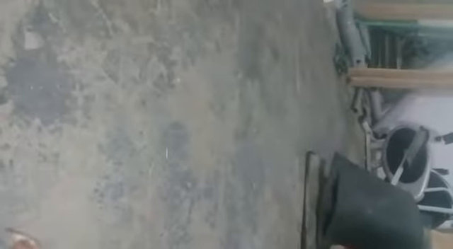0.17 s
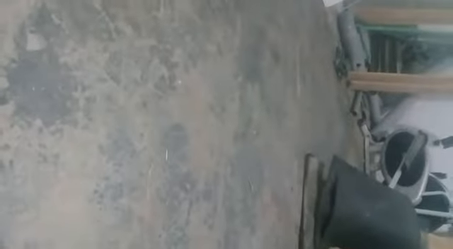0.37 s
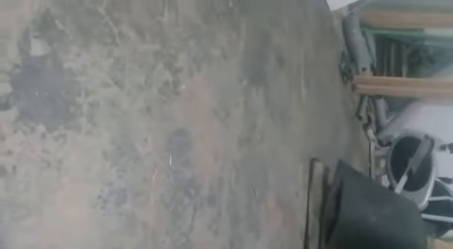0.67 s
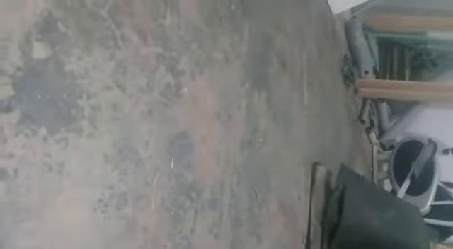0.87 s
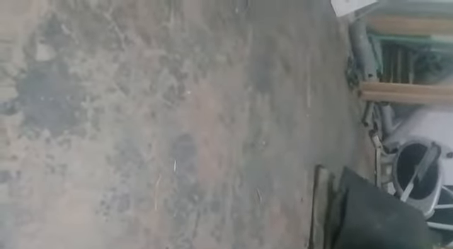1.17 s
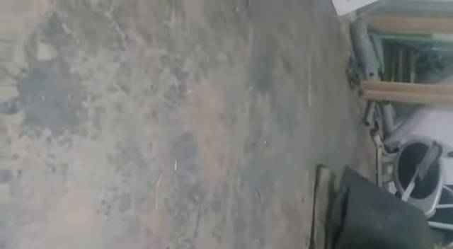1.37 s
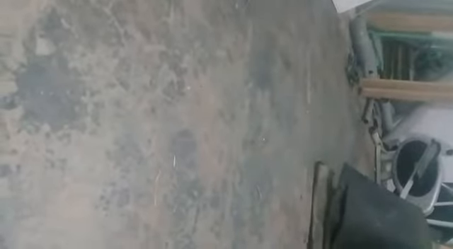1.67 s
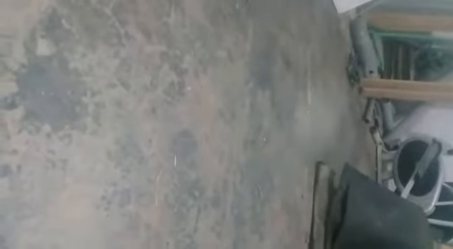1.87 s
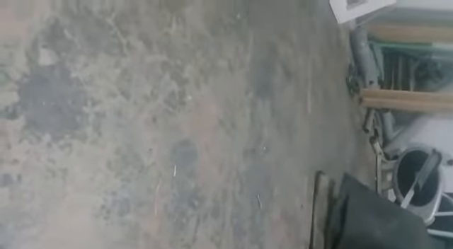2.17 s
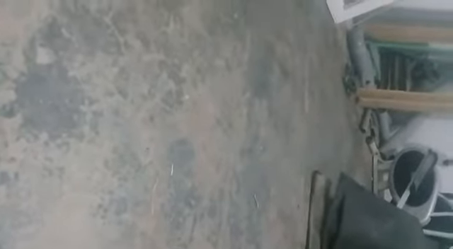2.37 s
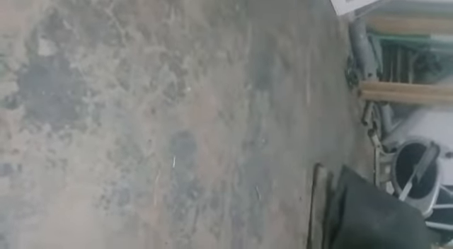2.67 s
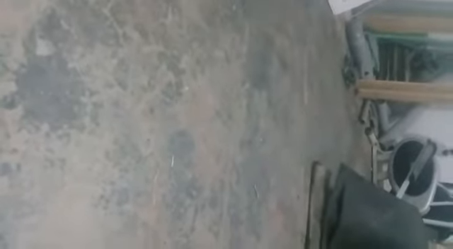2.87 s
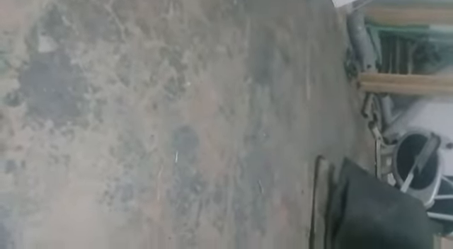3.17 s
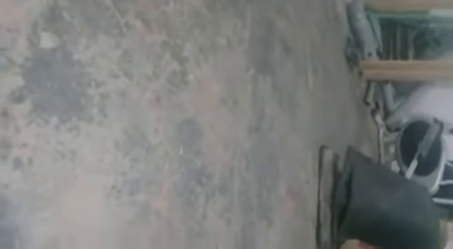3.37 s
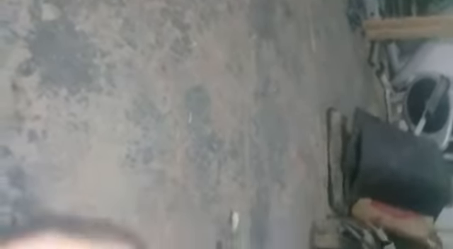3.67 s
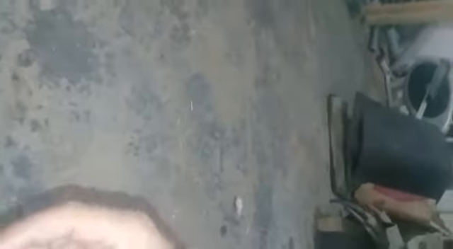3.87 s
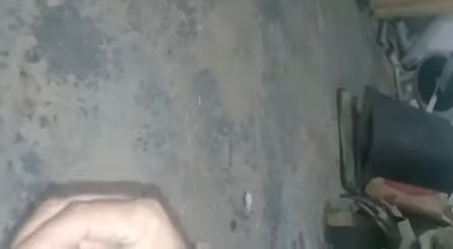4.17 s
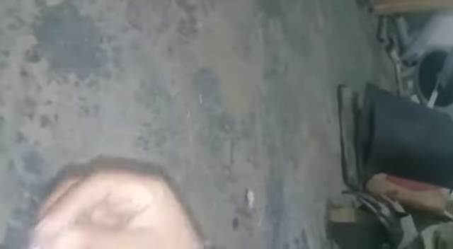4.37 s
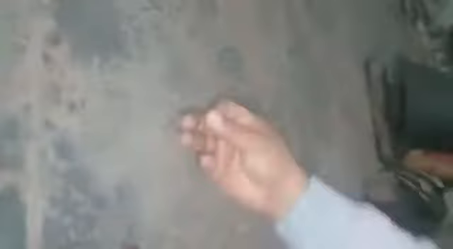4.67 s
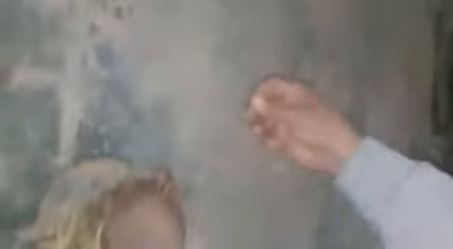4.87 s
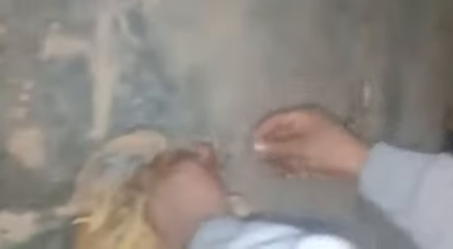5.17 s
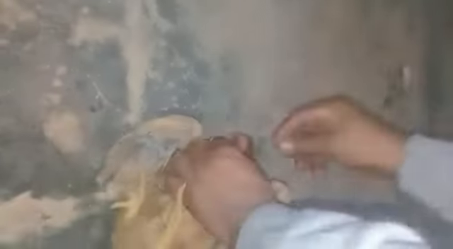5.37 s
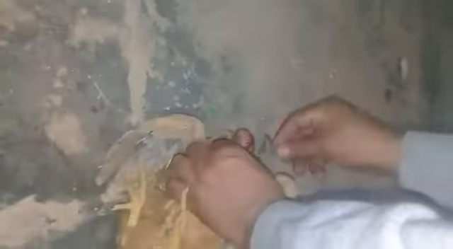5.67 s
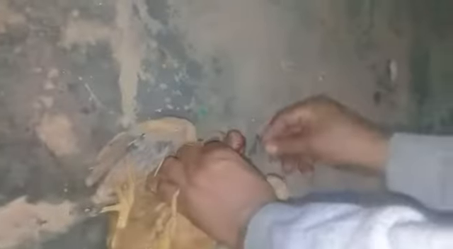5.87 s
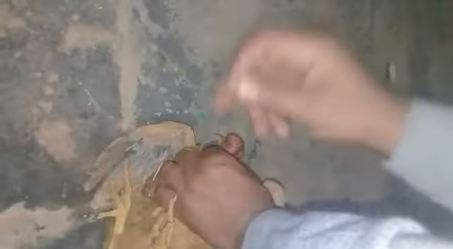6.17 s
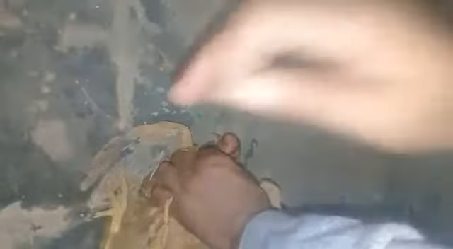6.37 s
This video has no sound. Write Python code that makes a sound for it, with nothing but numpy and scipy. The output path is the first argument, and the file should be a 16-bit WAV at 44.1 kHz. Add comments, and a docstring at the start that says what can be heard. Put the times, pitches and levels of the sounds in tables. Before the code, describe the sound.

A young chicken held down by hand gives shrill squawks and short chirps, with rustling feathers and light thuds in a bare, echoing room.

```python
"""In a bare, echoing room, a young chicken is held down by hand.
Its voice box makes gliding whistles: long squawks that break into hoarse half-pitch tones, short chirps
and tired whimpers. Feathers and sleeves rustle, claws tick, and the struggle thuds on the floor and
sets the room ringing. A faint far hum comes and goes."""
import sys
import numpy as np
from scipy import signal
from scipy.fft import rfft, irfft, next_fast_len
from scipy.io import wavfile

SR = 44100
rng = np.random.default_rng(int(sys.argv[2]) if len(sys.argv) > 2 else 0)


def waveform_to_disk(signal):
    """Save audio, clipped to [-1, 1], as 16-bit WAV at the path in sys.argv[1]."""
    frames = np.transpose(np.atleast_2d(signal))
    scaled = np.clip(frames, -1, 1) * 32767
    samples = np.round(scaled).astype(np.int16)
    wavfile.write(sys.argv[1], SR, samples)


N = 287223
TIME = np.arange(N) / SR


def from_db(db):
    """Turn decibels into a gain."""
    return 10 ** (np.asarray(db) / 20)


def rms_one(x):
    """Scale a sound to an average strength (rms) of 1."""
    return x / np.sqrt(np.mean(x ** 2) + 1e-20)


def ease(x):
    """A smooth step from 0 to 1."""
    return np.sin(np.pi / 2 * np.clip(x, 0, 1)) ** 2


def at_hz(points, hz):
    """Read a table at any frequency, with octaves evenly spaced."""
    known_hz, value = np.transpose(points)
    return np.interp(np.log(np.maximum(hz, 1)), np.log(known_hz), value)


def colour(x, spectrum):
    """Make each frequency of a sound louder or softer, as a table says."""
    gain = from_db(at_hz(spectrum, np.fft.rfftfreq(2 * len(x), 1 / SR)))
    return irfft(rfft(x, 2 * len(x)) * gain)[:len(x)]


def noise(spectrum):
    """Noise with the given tone colour, at strength 1."""
    return rms_one(colour(rng.standard_normal(next_fast_len(N, True)), spectrum)[:N])


def in_time(rows, t=TIME):
    """Read the columns of a curve at times t."""
    times, *columns = np.transpose(rows)
    return [np.interp(t, np.maximum.accumulate(times), column) for column in columns]


def during(rows, fade_s):
    """1 while a curve lasts, with short fades at both ends."""
    return np.clip(np.minimum(TIME - rows[0][0], rows[-1][0] - TIME) / fade_s, 0, 1)


def drift(rate_hz, count=N):
    """A smooth random wander, about 1 in size."""
    white = rng.standard_normal(max(count, SR) + SR // 4)
    smooth = signal.sosfilt(signal.butter(2, rate_hz, fs=SR, output="sos"), white)
    return rms_one(smooth[SR // 4:])[:count]


def still_air():
    """The room's steady, low background noise."""
    # tone colour of the air: (frequency [Hz], level [dB])
    spectrum = [(15, -23.5), (25, -12.5), (64, 0), (130, 4.5), (242, -10), (326, -5.5), (624, -11),
                (695, -12), (988, -18), (1520, -18), (1940, -17.5), (2910, -24), (8590, -28), (14800, -26),
                (16000, -27.5)]
    return noise(spectrum)


def far_hum(level_db, waver, fade_s):
    """A far tone that swells and fades, wavering a little in pitch."""
    # swells of the hum: (start [s], length [s], pitch [Hz], level [dB], octave above vs. the hum [dB])
    swells = [(1.79, 0.67, 347, -66, -16.5), (3.99, 0.12, 362, -54.5, -20), (4.12, 0.084, 353, -58, -18),
              (4.382, 0.12, 346, -60.5, -24), (4.514, 0.21, 349, -53.5, -23), (4.726, 0.08, 362, -53, -34),
              (4.894, 0.14, 366, -64.5, -20), (5.122, 0.25, 352, -70.5, -12), (5.49, 0.32, 352, -59.5, -25),
              (5.92, .12, 346, -56, -29), (6.03, 0.21, 361, -57.5, -12.5)]
    out = 0
    wavering_time = np.cumsum(1 + waver * drift(27)) / SR
    for start, length, hz, db, octave_db in swells:
        swell = ease(.5 + np.minimum(TIME - start, start + length - TIME) / fade_s)
        phase = 2 * np.pi * hz * wavering_time
        out += from_db(level_db + db) * swell * (np.sin(phase) + from_db(octave_db) * np.sin(2 * phase))
    return np.sqrt(2) * out


def room_echo(first_wall_s, build_s, early_db, early_s):
    """The room's answer to a click: dense echoes start after the first wall, then die away."""
    # how long the room rings: (frequency [Hz], time to fall 60 dB [s])
    ring_times = [(100, 1), (300, 0.74), (800, 0.63), (2100, 0.8), (3200, 0.79), (5500, 0.6), (10000, 0.11),
                  (15000, 0.24)]
    t, hz = TIME[:SR], np.fft.rfftfreq(SR, 1 / SR)
    white = rfft(rng.standard_normal(SR))
    centres, falls = np.transpose(ring_times)
    tail = 0
    for share, ring_s in zip(np.eye(len(centres)), falls):
        band = irfft(white * np.interp(hz, centres, share), SR)
        tail += band * from_db(-60 * t / ring_s)
    swell = np.clip((t - first_wall_s) / build_s, 0, 1) * (1 + from_db(early_db) * np.exp(-t / early_s))
    midrange = swell * from_db(-60 * t / at_hz(ring_times, 1500))
    return tail * swell / np.sqrt(np.sum(midrange ** 2))


def room_boom(blows):
    """Waves trapped between the walls ring on after each blow."""
    # the room's low notes: (pitch [Hz], level [dB], time to fall 60 dB [s])
    notes = [(133, -60, 0.76), (234, -48, 0.53), (302, -57, 1.2), (352.2, -43.5, 0.81)]
    t = TIME[:SR]
    ring = sum(from_db(db - 60 * t / ring_s) * np.sin(2 * np.pi * hz * t) for hz, db, ring_s in notes)
    return from_db(-9) * signal.fftconvolve(blows, ring)[:N]


def hands(level_db):
    """Hands shuffle with a faint, low noise."""
    # strength of the shuffling: (time [s], level [dB])
    shuffle = [(5.3, -63), (5.47, -90), (5.53, -64.5), (5.7, -67), (6.18, -70.5), (6.31, -80), (6.5, -86.5)]
    # its tone colour: (frequency [Hz], level [dB])
    spectrum = [(59, -45.5), (100, -17.5), (234, -7.5), (295, -15), (353, 4.5), (415, -6), (531, -11.5),
                (615, -28), (1420, -52), (2210, -31), (5000, -63), (6500, -71), (11000, -120)]
    return from_db(in_time(shuffle)[0] + level_db) * during(shuffle, fade_s=0.046) * noise(spectrum)


def sleeve():
    """Sliding cloth gives a soft hiss."""
    # strength of the slide: (time [s], level [dB])
    slide = [(4.6, -51), (4.8, -56), (5.03, -69), (5.12, -62.5), (5.25, -68.5), (5.38, -100)]
    # tone colour of cloth: (frequency [Hz], level [dB])
    spectrum = [(2650, 0.5), (4500, 8), (5710, 9), (6350, 6), (8030, 1.5), (13500, 0.5), (16000, -6)]
    return from_db(in_time(slide)[0]) * during(slide, fade_s=.05) * noise(spectrum)


def feathers_and_claws(rub_db, swish_db, grain_db, tick_db, tick_decay_s):
    """Feathers catch and slip in tiny grains as they rub and swish; claws and quills tick sharply."""
    # feathers rubbing under the hands: (time [s], level [dB])
    rubbing = [(0.0, -60.5), (.42, -68), (.61, -56.5), (.8, -75), (.92, -52.5), (1.04, -52), (1.12, -56),
               (1.2, -51), (1.42, -52.5), (1.56, -66), (1.62, -46), (1.79, -47.5), (1.95, -77)]
    # quick feather swishes: (time of peak [s], level [dB], decay [s])
    swishes = [(0.34, -52.5, 0.0093), (0.439, -55, 0.02), (.505, -48.5, 0.018), (0.583, -46.5, 0.0074),
               (.628, -40, .022), (1.0, -46, 0.047), (1.053, -35, 0.0094), (1.172, -45.5, 0.047),
               (1.245, -49, 0.088), (1.48, -46.5, .018), (1.603, -42.5, 0.021), (1.65, -53.5, 0.0087),
               (1.765, -50.5, .05), (3.2, -66, 0.099), (3.594, -23.5, .014), (3.62, -39.5, 0.03)]
    # ticks of claws and quills: (time [s], level [dB])
    ticks = [(0.324, -44), (0.383, -41.5), (0.624, -38), (1.047, -28.5), (1.076, -35.5), (1.141, -45),
             (1.243, -34.5), (1.597, -39.5), (2.146, -50)]
    # tone colour of rubbing: (frequency [Hz], level [dB])
    rub_colour = [(240, -18), (400, -9), (570, -15), (777, -15), (1130, -6.5), (2090, 1.5), (2840, -21.5),
                  (3990, -7.5), (4800, -22), (5870, -12), (10700, -29.5), (12700, -21.5), (16000, -36)]
    # tone colour of swishes and ticks: (frequency [Hz], level [dB])
    flick_colour = [(290, -41), (500, -21), (761, -0.5), (1670, -20), (2070, 6.5), (2690, -11.5),
                    (3750, -6.5), (11100, -8), (12100, -9), (15100, -18.5), (16000, -8.5)]
    grains = rms_one(from_db(grain_db * drift(230)))
    rub = from_db(rub_db + in_time(rubbing)[0]) * during(rubbing, fade_s=0.0023) * noise(rub_colour)
    strokes = cracks = 0
    for peak, db, decay in swishes:
        rise = .35 * decay
        from_peak = np.maximum((peak - TIME) / rise, (TIME - peak) / decay)
        strokes += from_db(swish_db + db) * np.exp(-from_peak.clip(0, 50))
    for start, db in ticks:
        age = TIME - start
        cracks += from_db(tick_db + db) * (age >= 0) * np.exp(-np.clip(age / tick_decay_s, 0, 50))
    return grains * (rub + strokes * noise(flick_colour)) + cracks * noise(flick_colour)


def thuds(lowest_hz, rise_s):
    """Blows of body and hands: short low bursts of noise, each with its own brightness and decay."""
    # blows on floor and bird: (time [s], level [dB], decay [s], brightness [Hz])
    blows = [(.005, -37, 0.074, 380), (0.03, -53, 0.018, 342), (.01, -69, 0.094, 1680),
             (.199, -52.5, 0.22, 340), (0.452, -45.5, .024, 513), (0.505, -49, 0.056, 437),
             (1.052, -47.5, 0.031, 1305), (1.14, -38, 0.004, 1300), (1.168, -44, 0.017, 1198),
             (1.075, -53, .015, 1300), (1.239, -28, 0.0027, 1400), (1.259, -61, 0.24, 500),
             (1.628, -50.5, 0.1, 720), (1.726, -35.5, 0.021, 296), (1.746, -38, 0.018, 352),
             (1.772, -28.5, 0.0054, 540), (3.274, -51.5, .04, 1103), (3.348, -54, 0.059, 217),
             (3.461, -52, 0.028, 394), (3.59, -47.5, 0.014, 1200), (3.726, -43.5, 0.014, 600)]
    # tone colour of a blow: (frequency [Hz], level [dB])
    spectrum = [(30, -6), (65, 9), (110, -3), (200, -5), (300, -1.5), (450, -2.5), (580, -2), (800, 2.5),
                (1100, 0.5), (2000, 16), (4000, -14)]
    out, t = np.zeros(N), TIME[:SR // 2]
    for start, db, decay, bright_hz in blows:
        band = signal.butter(2, [lowest_hz, bright_hz], "band", fs=SR, output="sos")
        burst = rms_one(signal.sosfilt(band, rng.standard_normal(len(t))))
        at = int(start * SR)
        out[at:at + len(t)] += from_db(db) * burst * np.exp(-t / decay) * (1 - np.exp(-t / rise_s))
    return colour(out, spectrum)


def strain(pitch, phase, flutter, hoarse, doubling, overtone_db):
    """The harsh top of a strained voice: overtones and raspy air, coloured by throat and beak."""
    # the voice's overtones, from twice the pitch upward: (level [dB])
    overtones = [-0.5, -4.5, -10.5, -13.5, -8.5, -14.5]
    # tone colour of throat and beak: (frequency [Hz], level [dB])
    throat = [(200, -29.5), (700, 0.5), (1500, -3.5), (2200, 12.5), (3100, 10), (4000, 4.5), (4700, -8),
              (6000, 0), (8000, -2.5), (9800, 4.5), (12200, -1.5), (15500, -18)]
    count = len(pitch)
    rasp = from_db(-2) * rms_one(colour(rng.standard_normal(SR), throat))[:count]
    out = rasp * (.1 + hoarse) * (1 + 0.22 * np.cos(phase))  # air escapes once a cycle
    slope_db = .35 * min(overtone_db + 22, 0)  # a relaxed voice loses its highest overtones first
    # hoarseness blurs the overtones' pitch and weakens them
    scatter = 2 * np.pi * np.cumsum(pitch * 0.087 * (0.17 + hoarse) * drift(250, count)) / SR
    strength = np.exp(-0.2 * hoarse) * flutter
    for k, db in enumerate(overtones, 2):
        # alternating cycles add a tone half-way below each overtone
        for multiple, share in ((k, 1), (k - .5, from_db(-2) * doubling)):
            hz = multiple * pitch
            gain = share * from_db(db + (k - 1) * slope_db + at_hz(throat, hz)) * (hz < SR / 2)
            out += gain * strength * np.sin(multiple * (phase + scatter))
    build_s, clear_share = .028, 0.17  # strain takes time to build; a clear whistle has little
    onset = 1 - np.exp(-(TIME[:count] / build_s) ** 2)
    fullness = clear_share + (1 - clear_share) * np.tanh(hoarse / 0.24)
    return from_db(overtone_db) * out * onset * fullness


def beak_gain(hz, opening):
    """The beak favours some pitches, and which ones depends on how far it is open."""
    # tone colour with the beak nearly shut: (frequency [Hz], level [dB])
    shut = [(700, -20), (1000, 3), (1250, -8.5), (1450, 5.5), (1750, -11.5), (2080, 3.5), (2280, -5),
            (2450, -13.5), (2800, -27), (3500, -16.5), (3900, -14), (4500, -23.5)]
    # tone colour with the beak wide open: (frequency [Hz], level [dB])
    wide = [(700, -5.5), (1050, -17.5), (1450, -10), (1750, -2.5), (2200, -1.5), (2850, 0), (3500, -4.5),
            (4000, -1), (4600, -14)]
    return from_db((1 - opening) * at_hz(shut, hz) + opening * at_hz(wide, hz))


def voice_box(start, pitch, effort_db, hoarse, beak, under_db, overtone_db, direct_db):
    """A vibrating membrane makes one call. Returns the sound sent into the room and the direct sound."""
    # the mouth's ring, stirred by rough air: (frequency [Hz], level [dB])
    growl_colour = [(200, -100), (900, -42), (1350, -18.5), (1550, -7), (1800, -10), (2100, 3), (2350, -7),
                    (2700, -21.5), (4500, -45.5), (12000, -80.5)]
    count = len(pitch)
    t, hoarse, beak = TIME[:count], np.clip(hoarse, 0, 1), np.clip(beak, 0, 1)
    # a hoarse membrane beats unevenly in both timing and strength
    wobble = 1 + 0.011 * (.33 + 2 * hoarse) * drift(180, count) + .05 * hoarse * drift(900, count)
    shimmer = .85 * hoarse
    flutter = (1 + shimmer * drift(390, count)) / np.sqrt(1 + shimmer ** 2)
    phase = 2 * np.pi * np.cumsum(pitch * wobble) / SR
    whistle = beak_gain(pitch, beak) * flutter * np.sin(phase)
    doubling = np.minimum(2 * hoarse, 1)  # how much strong and weak cycles alternate
    harsh_top = strain(pitch, phase, flutter, hoarse, doubling, overtone_db)
    # the undertone strays around half the pitch
    stray = np.pi * np.cumsum(pitch * .13 * hoarse * drift(300, count)) / SR
    under_gain = from_db(under_db) * doubling * beak_gain(pitch / 2, beak)
    undertone = under_gain * flutter * np.sin(phase / 2 + stray)
    growl = from_db(-10.5) * hoarse * rms_one(colour(rng.standard_normal(SR), growl_colour))[:count]
    into_room = whistle + undertone + growl + harsh_top
    # hoarse stretches are mixed more echoey, clear whistles drier and closer
    whistle_db = direct_db - 8.5 * np.tanh(hoarse / 0.26)
    direct = from_db(whistle_db) * whistle + from_db(-6.5) * undertone
    direct += from_db(whistle_db / 2) * harsh_top
    fade = np.clip(np.minimum(t, t[-1] - t) / .004, 0, 1)
    out, at = np.zeros((2, N)), int(start * SR)
    out[:, at:at + count] = np.sqrt(2) * from_db(effort_db) * fade * np.array([into_room, direct])
    return out


def whimpers(base_hz, arch_hz, **voice):
    """The tired bird's soft notes: pitch and effort rise and fall together."""
    # faint notes: (start [s], length [s], peak effort [dB])
    notes = [(5.14, .12, -77), (5.88, .1, -79.5), (6.06, .1, -85.5)]
    out = 0
    for start, length, db in notes:
        arch = np.sin(np.pi * np.arange(0, length, 1 / SR) / length)
        out += voice_box(start, base_hz + arch_hz * arch, db + 8 * (arch - 1), beak=0, **voice)
    return out


def chirps(ebb_db_per_s, **voice):
    """Short clear cries, beak nearly shut: the pitch dives to a dip, swings up and falls away."""
    # chirps: (time of dip [s], dip [Hz], rise [s], crest [Hz], fall [s], end [Hz], effort [dB])
    cries = [(1.189, 2480, 0.0077, 2570, 0.0054, 2430, -35.5), (1.323, 2160, 0.012, 2603, 0.012, 1550, -36),
             (1.478, 2243, .010, 2453, 0.027, 1445, -26), (1.695, 2037, 0.0099, 2770, 0.019, 1775, -40),
             (1.774, 1989, 0.014, 2479, 0.01, 1830, -36.5), (2.583, 2085, 0.01, 2340, 0.021, 1760, -29.5)]
    dive_s, dive_octave_s, linger_s = 0.0098, 0.03, .003
    out = 0
    for dip_s, dip_hz, rise, crest_hz, fall, end_hz, db in cries:
        t = np.arange(-dive_s, rise + fall + linger_s, 1 / SR)
        pitch = dip_hz * (1 + (np.minimum(t, 0) / dive_octave_s) ** 2)
        pitch += (crest_hz - dip_hz) * ease(t / rise) + (end_hz - crest_hz) * ease((t - rise) / fall)
        effort_db = db - ebb_db_per_s * np.maximum(t, 0)
        out += voice_box(dip_s - dive_s, pitch, effort_db, beak=0, **voice)
    return out


def squawks():
    """Long cries climb from a clear whistle into a hoarse top and drop back."""
    # squawks: (beak opening [0-1], undertone [dB], overtones [dB], direct sound [dB], curve)
    # points of a curve: (time [s], pitch [Hz], effort [dB], hoarseness [0-1])
    cries = [ (0.801, -8.5, -23, 6.9, [(.838, 3405, -49.5, 0.62), (.85, 3573, -30, .6),
             (.86, 3834, -39.5, 0.5), (.867, 3860, -28, 0.13), (.895, 4046, -33, 0.2),
             (.905, 3900, -50, 0.1)]), (0, 15.5, -16, 12.2, [(2.017, 1876, -59, 0), (2.032, 2357, -35.5, 0),
             (2.037, 3083, -41, 0.12), (2.05, 3319, -41.5, 0.45), (2.088, 3150, -49.5, 0.09),
             (2.095, 2267, -32.5, 0.02), (2.108, 2110, -36, 0.02), (2.117, 1910, -32.5, 0.01),
             (2.122, 1650, -45, .25)]), (0, 10.5, -19.5, 2.3, [(2.385, 1673, -29, 0.01),
             (2.395, 2176, -25, 0), (2.402, 2452, -37, 0), (2.41, 3310, -33.5, 0.26),
             (2.45, 3838, -35, 0.44), (2.5, 3533, -43, 0.34), (2.545, 3395, -31, 0.04),
             (2.573, 3265, -32, 0.18)]), (1.002, -6.5, -19, 10, [(3.211, 1564, -48, 0),
             (3.219, 2010, -29.5, 0.08), (3.224, 2351, -22, 0.1), (3.236, 2484, -27.5, 0.15),
             (3.255, 3138, -33, 0.71), (3.295, 3372, -32.5, 0.71), (3.325, 3620, -28.5, 0.02),
             (3.375, 3040, -28.5, 0.36), (3.394, 2782, -18.5, 0.12), (3.417, 2560, -26.5, 0.15),
             (3.43, 2802, -33.5, .15), (3.437, 2306, -20.5, 0), (3.442, 1654, -24.5, 0.08),
             (3.462, 2390, -26, 0.03)]), (1, -6.5, -15.5, 1.8, [(3.645, 2444, -37.5, 0.67),
             (3.695, 2863, -30.5, 0.25), (3.718, 3160, -24, 0.05), (3.733, 3080, -32, 0.19),
             (3.739, 3000, -18.5, 0.08), (3.752, 3060, -36, 0.17), (3.826, 3010, -22.5, 0.04),
             (3.834, 2228, -34, 0), (3.846, 1727, -24, 0.24), (3.865, 1519, -20, 0.18),
             (3.876, 1380, -20.5, 0.26)]), (1.001, -27, -23.5, 3.6, [(4.523, 1696, -35, 0.03),
             (4.531, 2100, -31.5, 0.65), (4.538, 2766, -41.5, 0.75), (4.556, 3542, -32.5, 0.58),
             (4.61, 3770, -35.5, 1.11), (4.668, 3826, -34, 0.66), (4.695, 3687, -32, 0.68),
             (4.718, 2850, -37, 0), (4.743, 1467, -25.5, 0.23), (4.77, 1282, -30.5, 0)]), ]
    out = 0
    for beak, under_db, overtone_db, direct_db, curve in cries:
        start, end = curve[0][0], curve[-1][0]
        pitch, effort_db, hoarse = in_time(curve, TIME[int(start * SR):int(end * SR)])
        out += voice_box(start, pitch, effort_db, hoarse, beak, under_db, overtone_db, direct_db)
    return out


def scene():
    """Bird and struggle echo in the same room, over the hum and still air."""
    room = room_echo(first_wall_s=0.0033, build_s=0.0053, early_db=-8, early_s=0.3)
    rustle = feathers_and_claws(rub_db=0.5, swish_db=-1.5, grain_db=3, tick_db=-4.5, tick_decay_s=0.0031)
    rustle += sleeve()
    blows = thuds(lowest_hz=110, rise_s=0.00034)
    background = hands(level_db=2.5) + far_hum(level_db=-2, waver=0.0097, fade_s=0.12)
    background += from_db(-69) * still_air()
    calls = squawks()
    calls += chirps(ebb_db_per_s=108, hoarse=0.02, under_db=-2.5, overtone_db=-26, direct_db=11)
    calls += whimpers(base_hz=1930, arch_hz=207.1, hoarse=0.21,
                      under_db=-11.5, overtone_db=-13.5, direct_db=9.5)
    voice_into_room, direct_voice = calls
    into_room = voice_into_room + from_db(-5) * rustle + from_db(-2.5) * blows
    echoes = signal.fftconvolve(into_room, room)[:N] + room_boom(blows)
    return (background + echoes + from_db(0.5) * rustle + blows + direct_voice)[None]


def record(dry):
    """Cut off the highest treble steeply."""
    cutoff_hz = 15850
    return signal.sosfilt(signal.ellip(12, .1, 80, cutoff_hz, fs=SR, output="sos"), dry)


dry = scene()
out = record(dry)
waveform_to_disk(out)
```